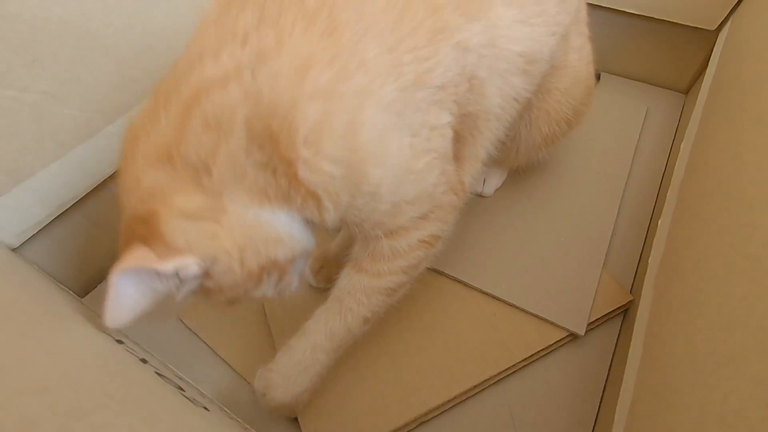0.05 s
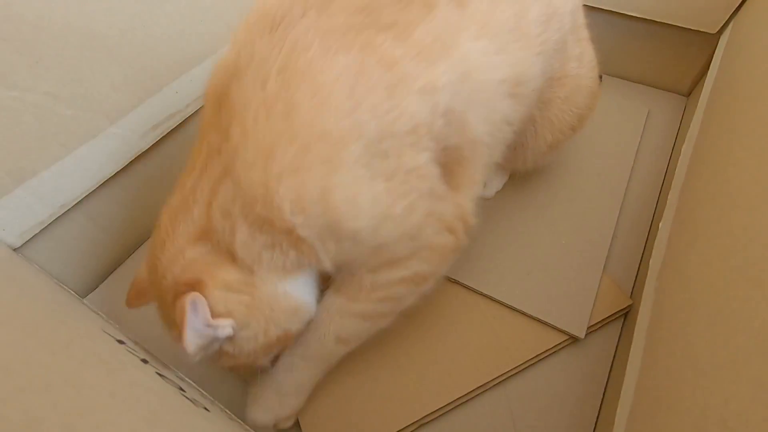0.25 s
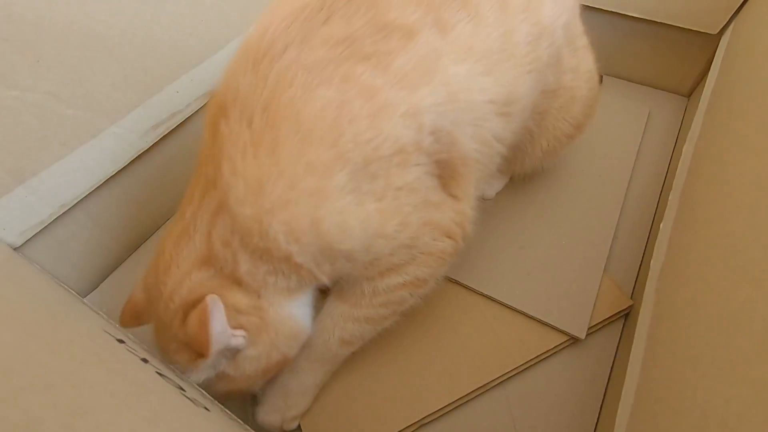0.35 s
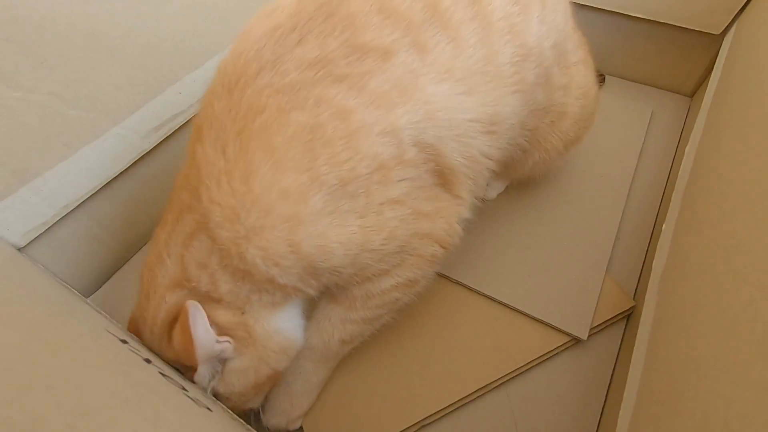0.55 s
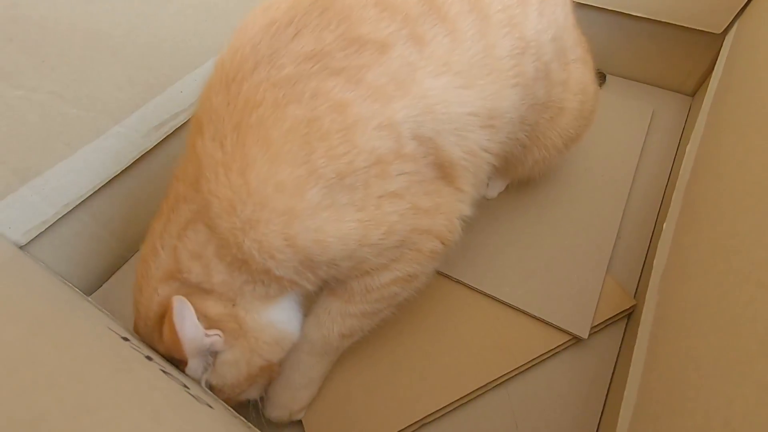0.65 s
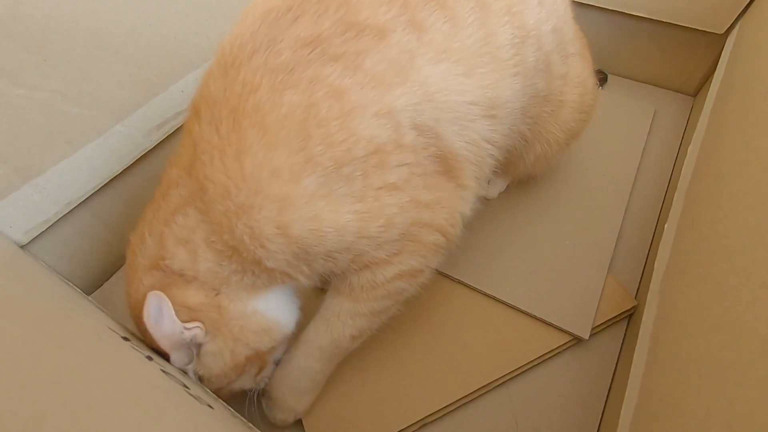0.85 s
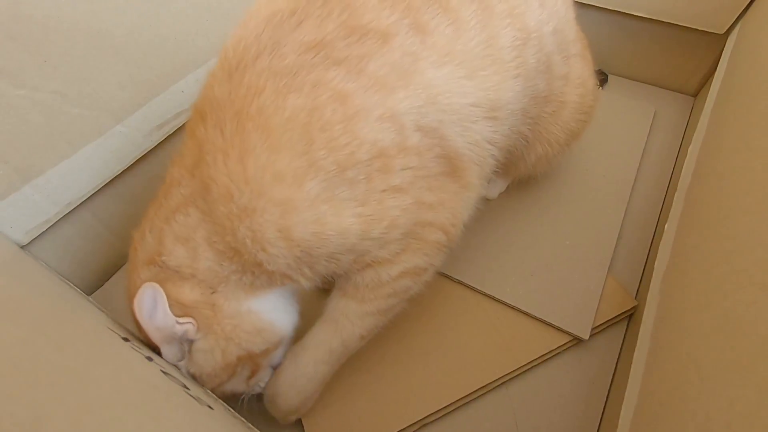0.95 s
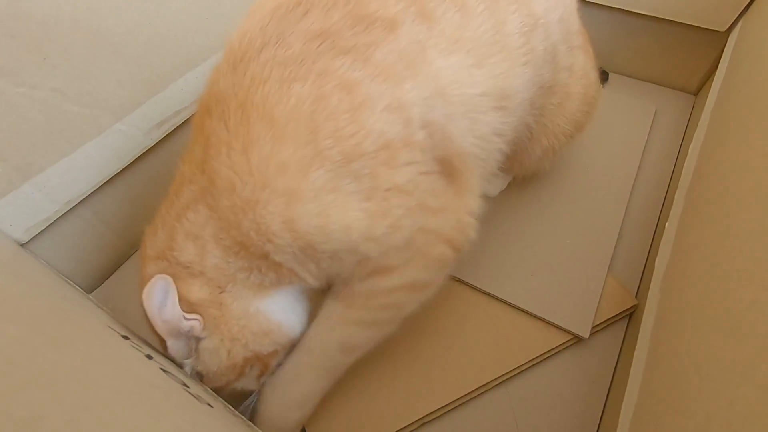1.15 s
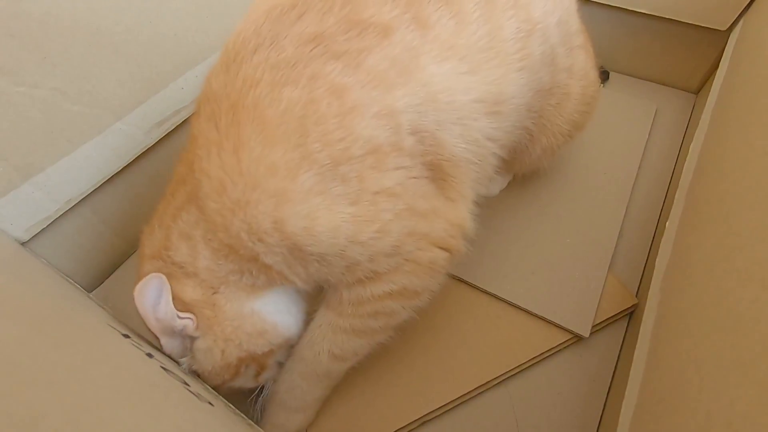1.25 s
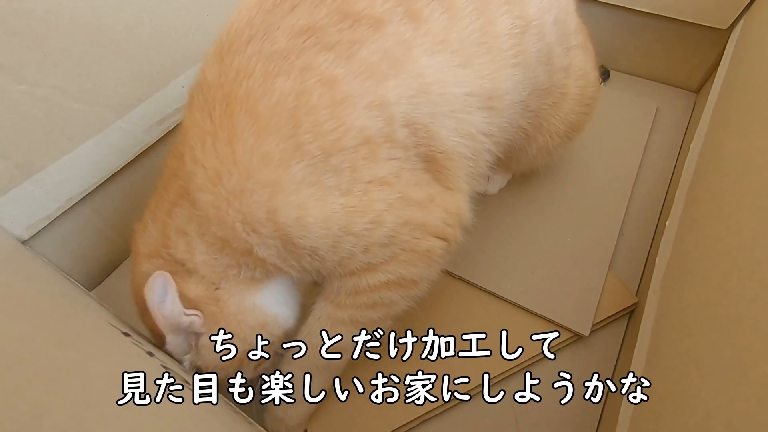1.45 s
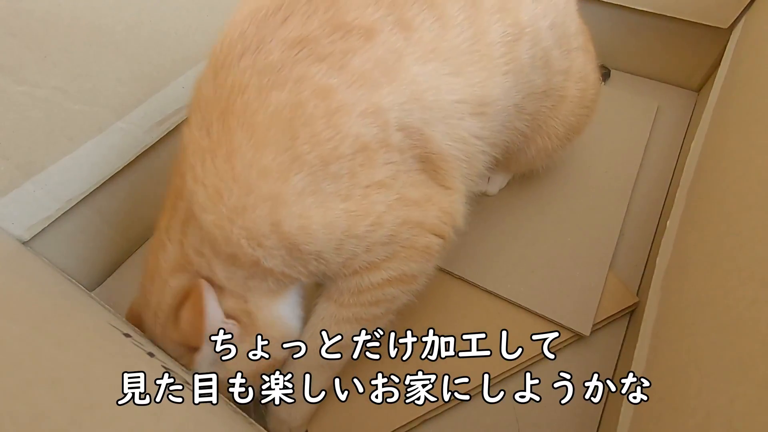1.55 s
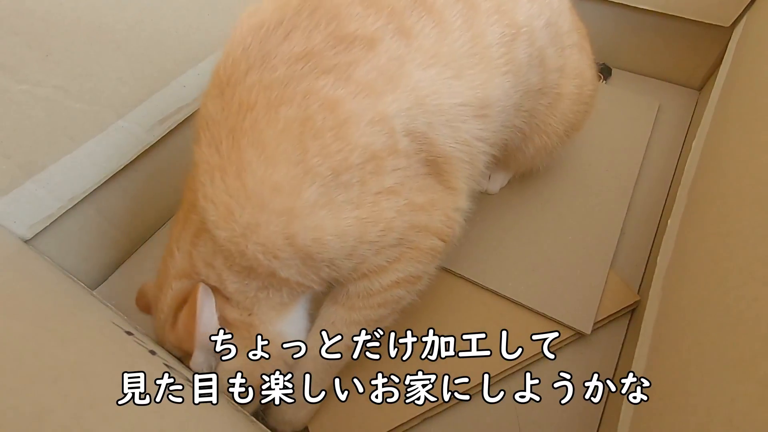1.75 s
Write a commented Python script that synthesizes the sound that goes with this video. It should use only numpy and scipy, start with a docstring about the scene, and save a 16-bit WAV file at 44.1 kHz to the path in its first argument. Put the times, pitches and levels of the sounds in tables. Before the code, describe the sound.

Claws snap and scrape on cardboard sheets as a cat moves in a box, with two louder cracks among soft thuds and brushing fur. The nearby microphone catches it slightly to the right, over a faint low indoor hum.

```python
"""Low room air and the hum of a far-off appliance; then a cat paws at loose cardboard sheets in a box.
Claws catch and snap off the sheets, which crack, flap and thud; pads scrape, fur brushes the card,
and the box rumbles under the cat's weight. Its walls throw each tap straight back and the small room
rings briefly. The cat sits a little to the right of a stereo microphone."""
import sys
import numpy as np
from scipy import signal
from scipy.io import wavfile

SR = 44100
rng = np.random.default_rng(int(sys.argv[2]) if len(sys.argv) > 2 else 0)


def dump_mix(stems):
    """Bounce the given channels to the path in sys.argv[1] as a 16-bit WAV at rate SR."""
    frames = np.atleast_2d(stems).T  # one column per channel
    limited = np.clip(frames, -1, 1)  # hard clip at full scale
    pcm = np.round(limited * 32767).astype(np.int16)
    wavfile.write(sys.argv[1], SR, pcm)


N = 79380
T = np.arange(N) / SR

# colour of the room air: frequency_hz, density_db
AIR_COLOUR = [(22, -6), (45, 0), (75, -12), (130, -9), (220, -6), (400, -13), (600, -17), (850, -14),
              (1200, -26), (1800, -36), (3000, -42), (6000, -45), (15000, -52)]
# rise and fall of the air: time_s, level_db
AIR_LEVEL = [(0, -59), (0.14, -63), (0.4, -58), (0.68, -60), (0.95, -59), (1.25, -61.5), (1.55, -57),
             (1.8, -56)]
# how alike diffuse sound is on the microphone's two sides: frequency_hz, likeness (0-1)
LIKENESS = [(30, .45), (150, .92), (500, 0.55), (2000, 0.2), (12000, 0.13)]
# partials of the appliance: multiple of HUM_HZ, gain_db
HUM_PARTIALS = [(2, -2.5), (3, -4.5), (4, -3), (5, -13), (6, -8.5), (7, -10.5), (8, -11)]
# swell of the hum: time_s, level_db
HUM_LEVEL = [(0, -74), (0.06, -55.5), (0.14, -53), (0.3, -55), (0.46, -59.5), (0.6, -90), (0.8, -76),
             (1.0, -61), (1.22, -55.5), (1.38, -71.5), (1.56, -55.5), (1.68, -48.5), (1.8, -51.5)]
# the cat shifts its weight: peak_s, half_length_s, level_db, centre_hz
WEIGHT_SHIFTS = [(0.066, 0.057, -57, 332.5), (0.15, 0.035, -50.5, 130.5), (0.311, 0.026, -56, 165),
                 (0.404, 0.036, -58, 186), (0.913, 0.075, -59.5, 207), (1.043, 0.09, -57.5, 54.5),
                 (1.503, 0.055, -62, 408), (1.741, 0.042, -51.5, 55), (1.76, 0.031, -64, 270)]
# colour of fur on card: frequency_hz, density_db
FUR_COLOUR = [(900, 10.5), (2000, -13), (3300, -9.5), (5000, 8), (6500, -1), (8500, -17), (12000, -6.5),
              (15000, -11)]
# rise and fall of the brushing: time_s, level_db
FUR_LEVEL = [(0, -95), (0.16, -74.5), (0.38, -93), (0.43, -70), (0.5, -83), (0.6, -68.5), (0.71, -81.5),
             (0.8, -61), (0.9, -69.5), (1.06, -70), (1.28, -74.5), (1.45, -76), (1.62, -77.5), (1.69, -66),
             (1.77, -56), (1.8, -66)]
# claw and sheet-edge taps, each with the two rings of the struck spot: start_s, level_db, spread_s,
# ring_hz, ring_db, ring_q, second_hz, second_db, low_hz, high_hz, crackle_db, left_over_right_db
TAPS = [(0.1470, -70.5, 0.0018, 1270, 15, 1.5, 2400, 0, 300, 3000, -33, -1),
        (0.1927, -46.5, 0.0012, 3500, 16, 2.7, 1910, 10.5, 300, 4340, -45, 1.5),
        (0.2036, -21, .0005, 2400, 14.5, 2.7, 760, 14, 199.5, 4630, -30, 1.5),
        (0.2065, -20.5, 0.00061, 3550, 9, 7.3, 1740, 8, 194, 4260, -46, -0.5),
        (0.2082, -29.5, 0.00087, 1460, 20, 1.3, 4870, 3, 250.6, 4460, -39, 3),
        (0.4290, -47.5, 0.001, 1840, 19.5, 3.9, 1290, 9.5, 291, 4270, -30, 2),
        (0.7951, -42, 0.00064, 4870, 2.5, 8.2, 1813, 12, 141, 6020, -42, 0),
        (0.7979, -50, 0.00079, 1880, 12, 2.8, 710, 15, 199, 5870, -32, -3),
        (0.8528, -52.5, .0016, 2650, 11, 5.1, 1800, 15, 706, 5950, -27, -2),
        (0.8549, -57, 0.00086, 2300, 4, 2.7, 4600, 19, 900, 5450, -28, 0),
        (0.9415, -50.5, 0.0019, 1400, 10, 2, 2600, 7, 399, 5500, -21, -2),
        (0.9507, -52.5, .0016, 4000, 16, 5.2, 1630, 21, 400, 6000, -15, 3),
        (1.0170, -41, .0013, 1160, 28, 15, 2620, -4, 198, 5000, -26, 1.5),
        (1.0208, -39.5, 0.00076, 1200, 13.5, 4.5, 4300, 5.5, 140, 5140, -14.5, 4),
        (1.0226, -55, .0005, 1120, 23, 5.3, 1390, 13.5, 300, 5000, -17, 10),
        (1.0319, -53.5, 0.0013, 1140, 7, 2.7, 2200, 1, 250, 3130, -26, 6),
        (1.0919, -40, .0006, 890, 8.5, 1.4, 2480, 3, 252, 2590, -16.5, 4),
        (1.0955, -51, 0.00072, 1080, -7, 2.6, 520, 2, 250, 2030, -27, 4),
        (1.1110, -26, .0003, 1076, 20.5, 4, 6320, 10, 150, 8200, -31, 0.5),
        (1.1254, -24.5, .0004, 3540, 19, 8.2, 2520, 13, 129.6, 6050, -17.5, 1),
        (1.3393, -37, 0.00057, 579, 20, 6.6, 2180, 8.5, 297, 3520, -33.5, 0.5),
        (1.343, -40.5, 0.00084, 886, 18, 4.1, 500, 4, 301.4, 2820, -27, 9),
        (1.474, -65.5, .0012, 2020, 6.5, 1.2, 4200, 3, 301, 4510, -23.5, -5),
        (1.7330, -57, 0.0018, 1400, 17, 1.06, 2300, 3, 297, 4500, -12, -2)]
# resonances of the sheets: pitch_hz, boost_db, width_hz
CARD_RESONANCES = [(365, 7.5, 45), (500, 12.5, 35), (760, 5, 70), (1168, 8.5, 70), (1549, 3.5, 130),
                   (2184, 4, 50), (2400, 1, 120), (2660, 0.5, 330), (3540, -3.5, 100), (4560, -1.5, 150),
                   (4723, -0.5, 140), (6157, -4, 500)]
# echoes off the box walls: delay_s, gain_db
WALL_ECHOES = [(.0029, -13), (.0047, -16), (.0078, -17)]
# diffuse ring of the box against the direct sound: frequency_hz, gain_db
BOX_RING = [(100, -12), (500, -2.5), (1500, -2.5), (3500, -7), (7000, -14), (14000, -6)]
# diffuse ring of the room against the direct sound: frequency_hz, gain_db
ROOM_RING = [(100, 10.5), (300, -1.5), (700, -6), (1300, -9), (2500, -10), (4000, -12.5), (7000, -12.5),
             (14000, -7)]
# decay of the room: frequency_hz, t60_s
ROOM_DECAY = [(100, 0.12), (600, 0.23), (2500, 0.2), (6000, 0.13), (14000, 0.11)]
# pads and claws drag over the card: peak_s, rise_s, fall_s, relative_level_db, brightness_hz
SCRAPES = [(0.2, 0.025, .004, -50, 3500), (0.229, 0.0062, 0.012, -32.5, 2960),
           (0.254, .008, 0.02, -37, 2800), (0.432, 0.0043, 0.0094, -44, 2210),
           (0.490, 0.024, 0.037, -47.5, 2920), (0.62, 0.1, 0.079, -61, 4900),
           (0.797, 0.042, 0.058, -51.5, 5250), (0.854, 0.014, 0.014, -50, 4460),
           (0.948, 0.019, 0.024, -51.5, 4500), (1.022, 0.013, 0.026, -53, 3430),
           (1.140, 0.014, 0.012, -44, 5000), (1.375, .012, 0.053, -51, 1800),
           (1.775, 0.029, 0.026, -50, 3960)]
# whole sheets flap under a paw: start_s, level_db, pitch_hz, swell_s, t60_s
FLAPS = [(0.206, -34, 164, 0.0019, 0.13), (0.207, -37.5, 333.7, .002, .1),
         (0.221, -35.5, 74.4, 0.0051, 0.24), (0.267, -30, 59.5, 0.0046, 0.13),
         (0.333, -33.5, 54.7, 0.0061, 0.11), (0.466, -43.5, 37.44, 0.0049, 0.14),
         (0.796, -35, 177, 0.0046, .11), (1.021, -35.5, 152.4, 0.0037, 0.11),
         (1.113, -24.5, 158, 0.0022, 0.046), (1.1265, -26.5, 158.7, 0.0012, 0.11),
         (1.152, -38.5, 76.5, 0.014, 0.29), (1.255, -37.5, 41, 0.014, 0.13),
         (1.341, -45.5, 365, 0.0014, 0.13), (1.342, -40.5, 234, 0.0017, 0.051),
         (1.455, -40, 46, .008, 0.087)]

HUM_HZ, HUM_WAVER_DB = 51.74, 5
OVERTONE_SHARE, OVERTONE_PIVOT_DB = .49, -71.5  # overtones follow this share of the swell about the pivot
FOLD_REFLECTION = .55  # share of a wave turned back at each fold
CRACKLE_S, CRACKLE_LOW_HZ = .002, 7000
BOX_ONSET_S, BOX_T60_S, ROOM_ONSET_S = .00091, .025, .012
SLIPS_PER_S, SLIP_SPREAD_DB, SCRAPE_LOW_HZ, SCRAPE_GAIN_DB = 8000, 1.5, 600, -11
MIC_TOP_HZ, MIC_STOP_HZ = 13600, 16400


def from_db(db):
    """Decibels to gain."""
    return 10 ** (np.asarray(db) / 20)


def rms_one(x):
    """Scale to rms 1."""
    return x / np.sqrt(np.mean(x ** 2) + 1e-20)


def in_time(rows):
    """Read a table at every sample."""
    return np.interp(T, *np.transpose(rows))


def at_hz(rows, hz):
    """Read a table on a log-frequency axis."""
    frequencies, values = np.transpose(rows)
    return np.interp(np.log(hz), np.log(frequencies), values)


def cut(x, hz, kind, order=2):
    """Butterworth filter."""
    sections = signal.butter(order, np.clip(hz, 10, .45 * SR), kind, fs=SR, output="sos")
    return signal.sosfilt(sections, x + 1e-18)


def bell(x, hz, db, q):
    """Lift or dip the band around hz by db."""
    b, a = signal.iirpeak(hz, q, fs=SR)
    return x + (from_db(db) - 1) * signal.lfilter(b, a, x + 1e-18)


def drift(rate_hz):
    """A random wander of spread about 1; it holds still after 200 points."""
    return np.interp(T * rate_hz, np.arange(200), rng.standard_normal(200))


def add(track, start_s, sound):
    """Lay a sound on a track."""
    i = round(start_s * SR)
    track[..., i:i + sound.shape[-1]] += sound[..., :N - i]


def dying(t, t60_s):
    """A decay of unit energy."""
    decay = from_db(-60 * t / t60_s)
    return decay / np.sqrt(np.sum(decay ** 2))


def noise_bands(size):
    """Half-octave bands of stereo noise, alike in the bass and less so in the treble: (hz, band)."""
    edges = 20 * 2 ** np.arange(0, 10.1, .5)
    white = rng.standard_normal((2, 2, size + SR // 10))
    for k, (low, high) in enumerate(zip(edges, edges[1:])):
        hz = np.sqrt(low * high)
        mid, side = cut(white[k % 2], [low, high], "band")[:, -size:]
        alike = at_hz(LIKENESS, hz)
        yield hz, (np.sqrt(1 + alike) * mid + np.sqrt(1 - alike) * side * [[1], [-1]]) / np.sqrt(2)


def wash(colour, flicker_db, rate_hz):
    """Coloured noise whose bands flicker; rms 1."""
    return rms_one(sum(band * from_db(at_hz(colour, hz) + flicker_db * drift(rate_hz))
                       for hz, band in noise_bands(N)))


def room_air():
    """Room tone: a low, gently wavering rush around the microphone."""
    return from_db(in_time(AIR_LEVEL)) * wash(AIR_COLOUR, flicker_db=1, rate_hz=36)


def appliance_hum():
    """Far off, a low motor tone swells and fades; its overtones waver and follow in part."""
    out, level_db = 0, in_time(HUM_LEVEL)
    overtone_db = OVERTONE_PIVOT_DB + OVERTONE_SHARE * (level_db - OVERTONE_PIVOT_DB)
    for k, (multiple, db) in enumerate(HUM_PARTIALS):
        swell_db = level_db if k == 0 else overtone_db + HUM_WAVER_DB * drift(rate_hz=7)
        phase = 2 * np.pi * (multiple * HUM_HZ * T + rng.random()) + .52 * drift(rate_hz=7)
        out += np.sqrt(2) * from_db(db + swell_db) * np.sin(phase)
    return out


def weight_shifts():
    """Soft low swells as the box takes the cat's weight."""
    out = np.zeros(N)
    for peak_s, half_s, db, hz in WEIGHT_SHIFTS:
        rumble = rms_one(cut(rng.standard_normal(N), [.77 * hz, 1.3 * hz], "band"))
        out += from_db(db) * np.exp(-((T - peak_s) / half_s) ** 2) * rumble
    return out


def fur_brush():
    """Fur brushes the card with a faint, flickering hiss."""
    return from_db(in_time(FUR_LEVEL)) * wash(FUR_COLOUR, flicker_db=1.2, rate_hz=140)


def fold_scatter(x, spread_s):
    """Waves bounce between the folds of a sheet: all-pass delays smear a push into a short crunch."""
    for lag_s in spread_s * np.array([.27, .61, 1]):
        feedback = np.r_[1, np.zeros(int(lag_s * SR)), FOLD_REFLECTION]
        x = signal.lfilter(feedback[::-1], feedback, x)
    return x


def claw_taps():
    """A sharp push is smeared by the sheet and rings the spot it hits; crushed fibres crackle."""
    out, size = np.zeros((2, N)), SR // 20
    over_5_ms = np.sqrt(.005 * SR / size)  # a tap's level counts its energy as if packed into 5 ms
    for (start_s, db, spread_s, ring_hz, ring_db, ring_q, second_hz, second_db,
         low_hz, high_hz, crackle_db, pan_db) in TAPS:
        push = fold_scatter(signal.unit_impulse(size), spread_s)
        push = cut(cut(push, high_hz, "low", order=3), low_hz, "high")
        tap = bell(push, ring_hz, ring_db, ring_q)
        tap = rms_one(bell(tap, second_hz, second_db, q=12))
        burst = rng.standard_normal((2, size)) * np.exp(-T[:size] / CRACKLE_S)
        crackle = from_db(crackle_db) * rms_one(cut(burst, CRACKLE_LOW_HZ, "high"))
        side_gains = from_db([[db + pan_db / 2], [db - pan_db / 2]])
        add(out, start_s, over_5_ms * (tap + crackle) * side_gains)
    return out


def cardboard_box(x):
    """The sheets resonate, then the box walls send back echoes that have lost their treble."""
    for hz, boost_db, width_hz in CARD_RESONANCES:
        x = bell(x, hz, boost_db, q=hz / width_hz)
    out, dull = x.copy(), cut(x, 5000, "low")
    for delay_s, db in WALL_ECHOES:
        add(out, delay_s, dull * from_db(db))
    return out


def box_and_room_ring(x):
    """Diffuse sound at the microphone: the quick ring of the box and the longer one of the room."""
    t, tail = T[:SR // 2], 0
    box_envelope = dying(t, BOX_T60_S) * (1 - np.exp(-t / BOX_ONSET_S))
    room_onset = 1 - np.exp(-(t / ROOM_ONSET_S) ** 2)
    for hz, band in noise_bands(len(t)):
        box = from_db(at_hz(BOX_RING, hz)) * box_envelope
        room = from_db(at_hz(ROOM_RING, hz)) * dying(t, at_hz(ROOM_DECAY, hz)) * room_onset
        tail += band * (box + room)
    return signal.fftconvolve(x.mean(axis=0)[None], tail, axes=1)[:, :N]


def pad_scrapes():
    """Pads and claws drag over the card in dense, tiny slips of uneven strength."""
    out = np.zeros(N)
    for peak_s, rise_s, fall_s, db, bright_hz in SCRAPES:
        slips = (rng.random(N) < SLIPS_PER_S / SR) * rng.choice([-1, 1], N)
        strength = from_db(SLIP_SPREAD_DB * np.minimum(rng.exponential(1, N), 4))
        friction = cut(cut(slips * strength, bright_hz, "low"), SCRAPE_LOW_HZ, "high")
        stroke = np.exp(-((T - peak_s) / np.where(T < peak_s, rise_s, fall_s)) ** 2)
        out += from_db(db + SCRAPE_GAIN_DB) * stroke * rms_one(friction)
    return out


def sheet_flaps():
    """A pressed sheet swings a few low cycles and dies away."""
    out, t = np.zeros(N), T[:SR // 2]
    for start_s, db, hz, swell_s, t60_s in FLAPS:
        envelope = from_db(db - 60 * t / t60_s) * (1 - np.exp(-t / swell_s))
        add(out, start_s, envelope * np.sin(2 * np.pi * hz * t))
    return out


def scene():
    """Paws in the box over the room tone, as heard from the microphone's position."""
    card = cardboard_box(claw_taps() + pad_scrapes())
    left, right = card + box_and_room_ring(card)
    left = bell(left, hz=1000, db=-11.5, q=.58)  # a flap of the box shades the left side
    paws = np.array([left, np.roll(right, 1)])  # the right side lags one sample
    mix = paws + sheet_flaps() + fur_brush() + room_air() + weight_shifts() + appliance_hum()
    return mix * from_db([[-.7], [.7]])  # the image leans right, where the cat sits


def record(dry):
    """The microphone dulls at the very top, then the band ends."""
    dulled = cut(dry, MIC_TOP_HZ, "low", order=3)
    band_edge = signal.cheby2(12, 70, MIC_STOP_HZ, fs=SR, output="sos")
    return signal.sosfilt(band_edge, dulled)


dry = scene()
out = record(dry)
dump_mix(out)
```